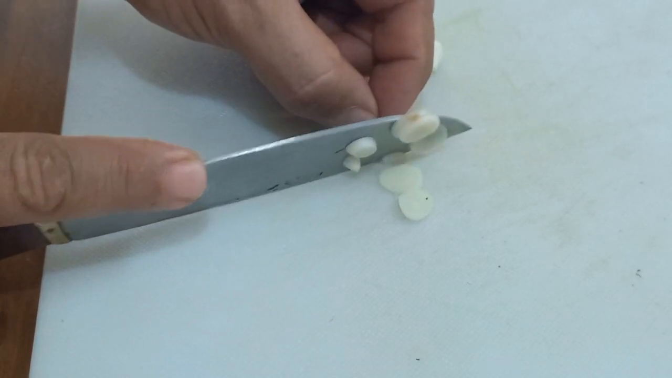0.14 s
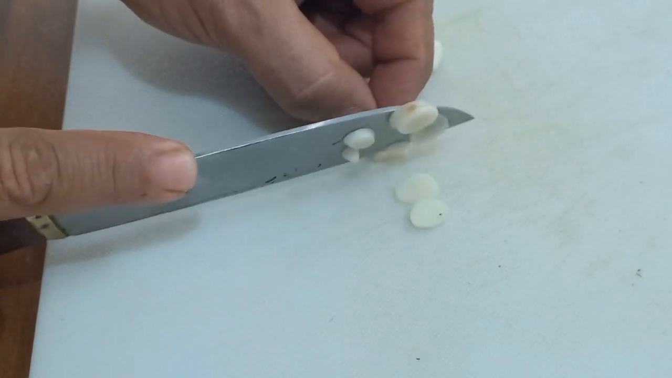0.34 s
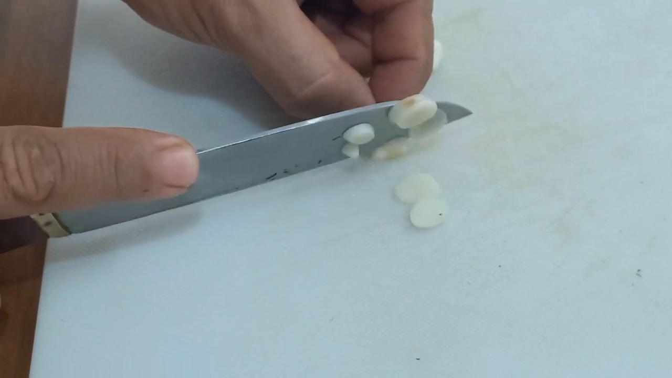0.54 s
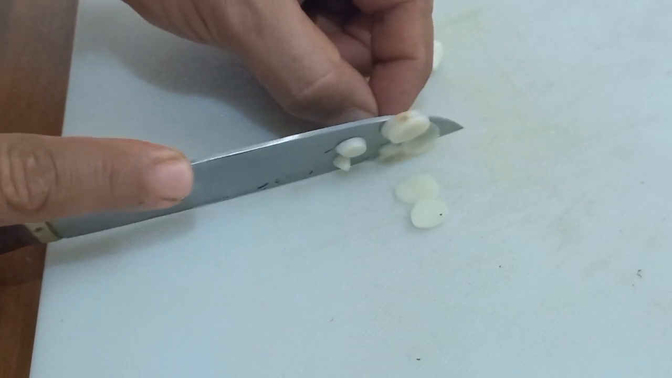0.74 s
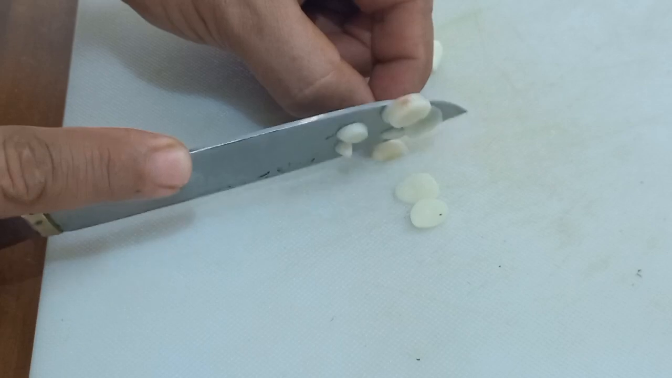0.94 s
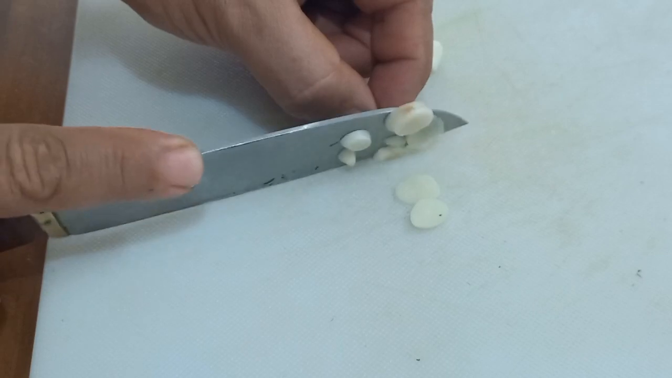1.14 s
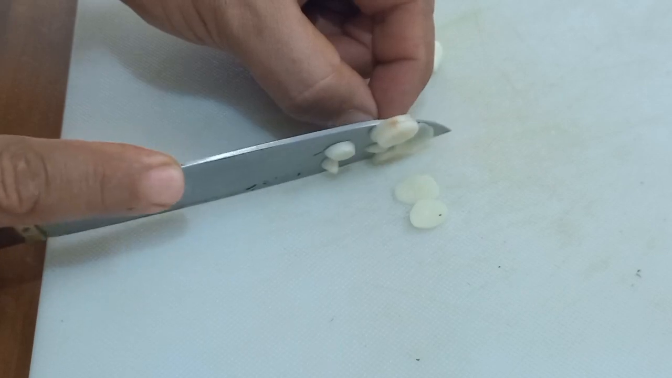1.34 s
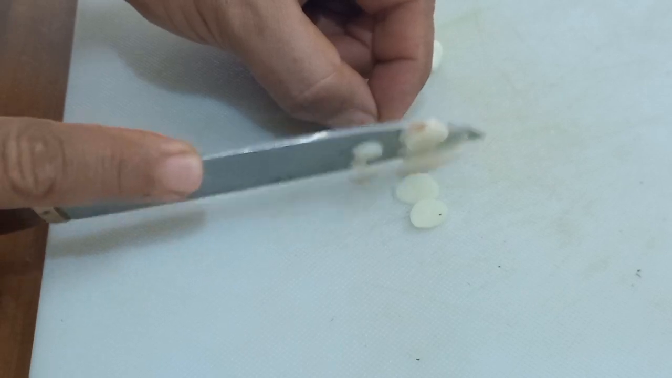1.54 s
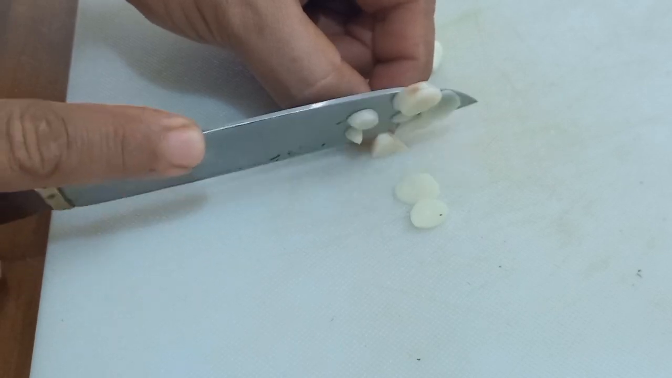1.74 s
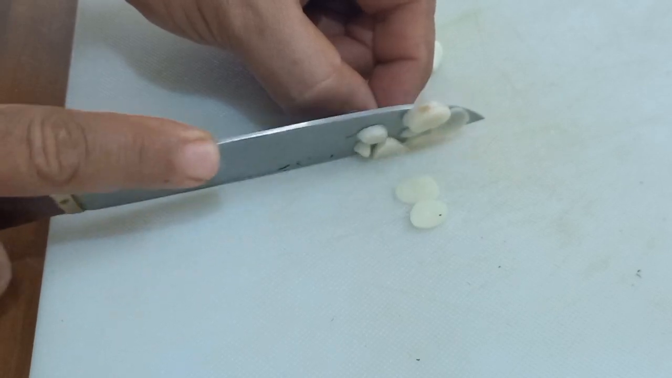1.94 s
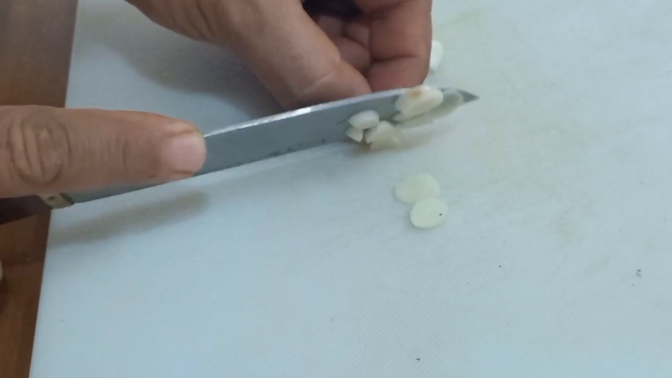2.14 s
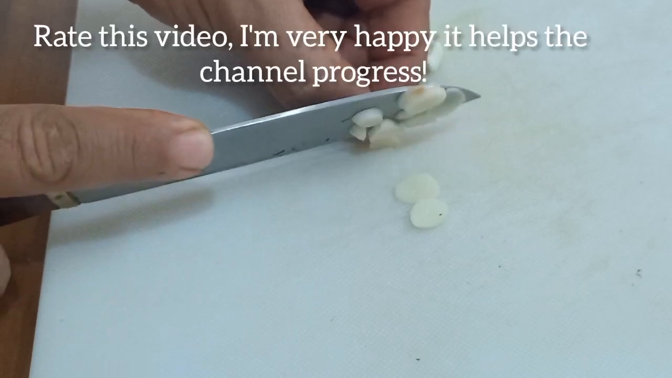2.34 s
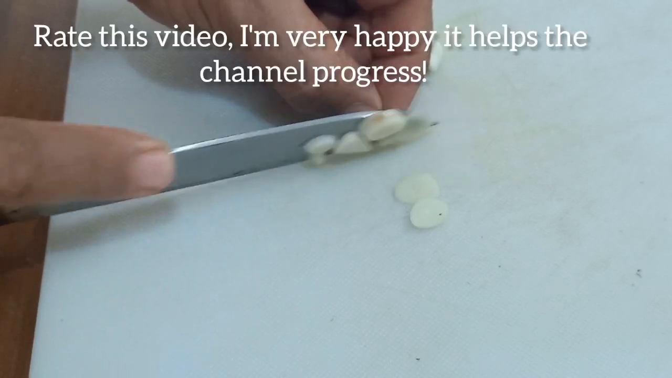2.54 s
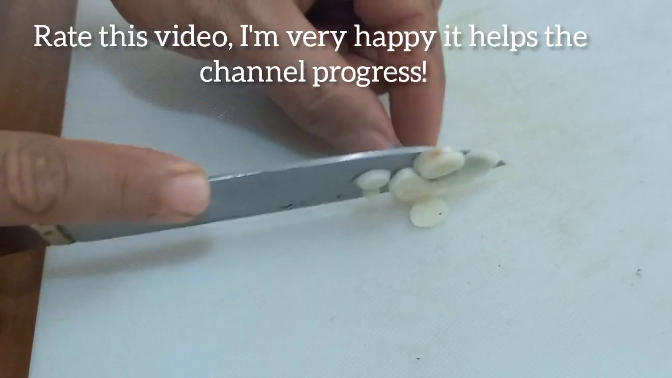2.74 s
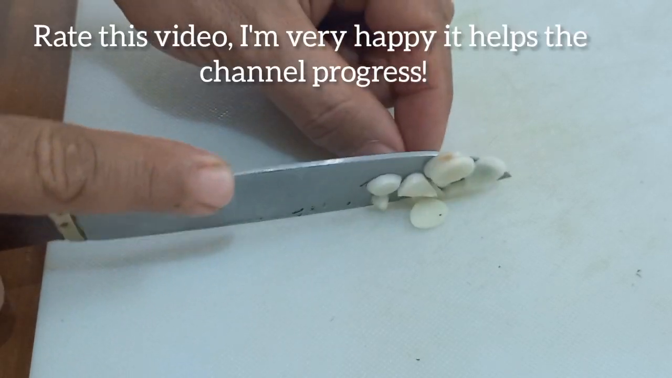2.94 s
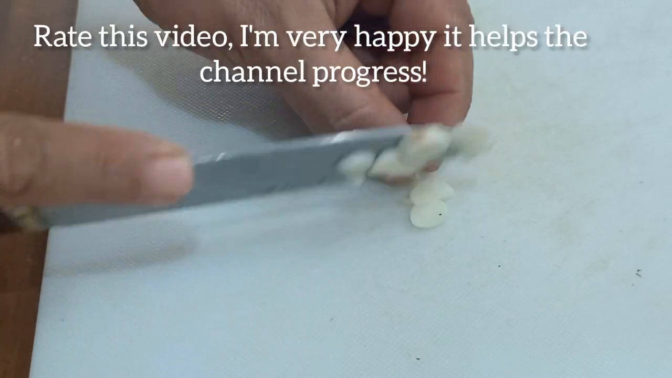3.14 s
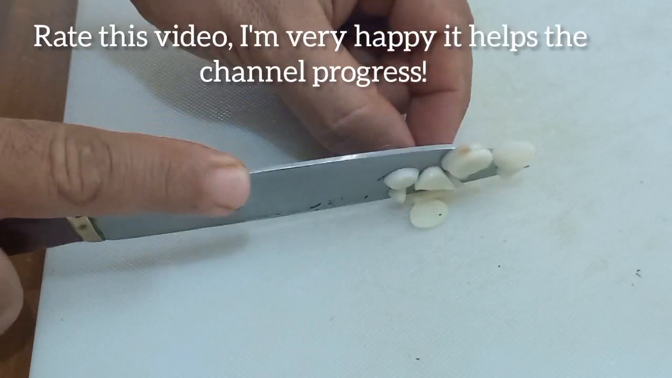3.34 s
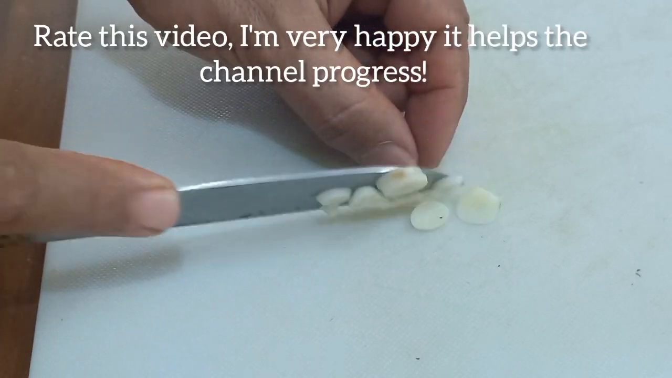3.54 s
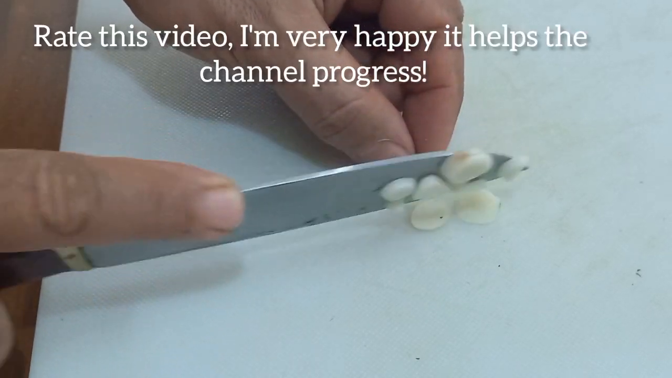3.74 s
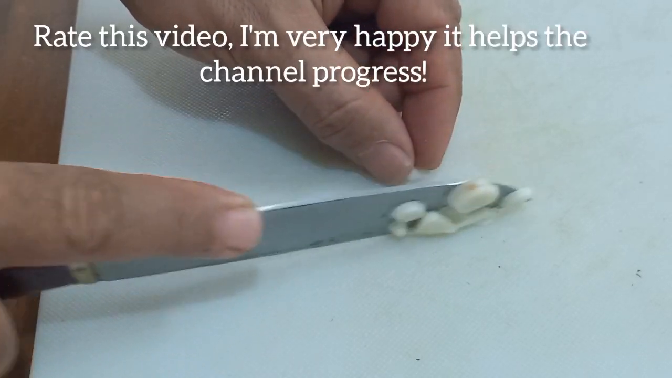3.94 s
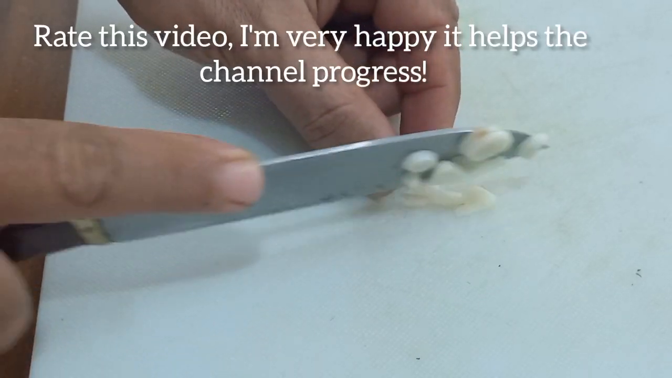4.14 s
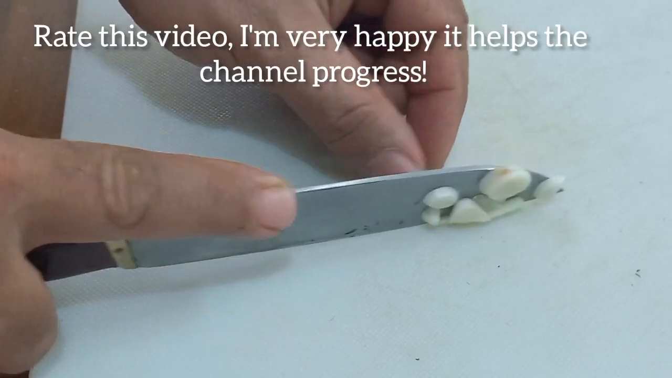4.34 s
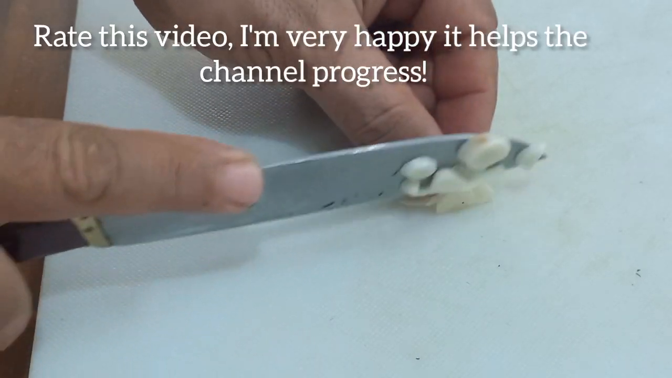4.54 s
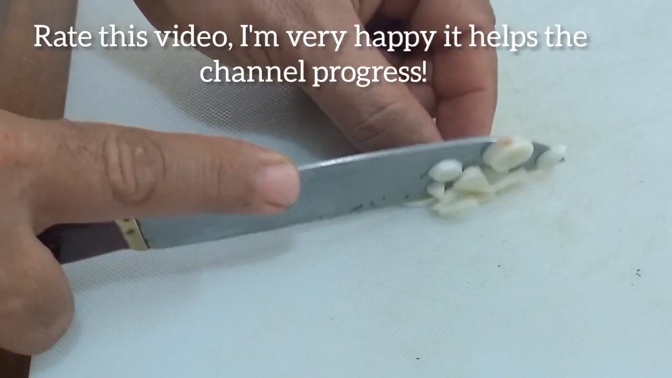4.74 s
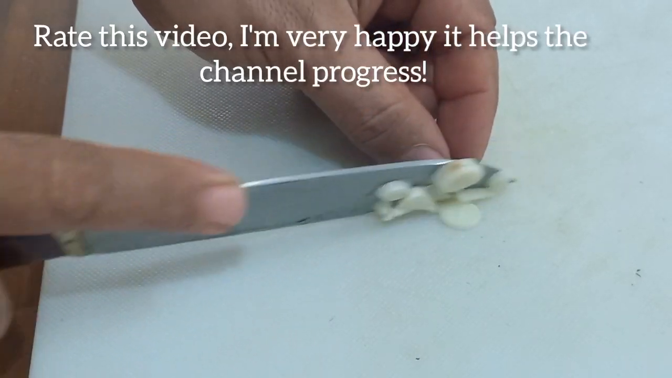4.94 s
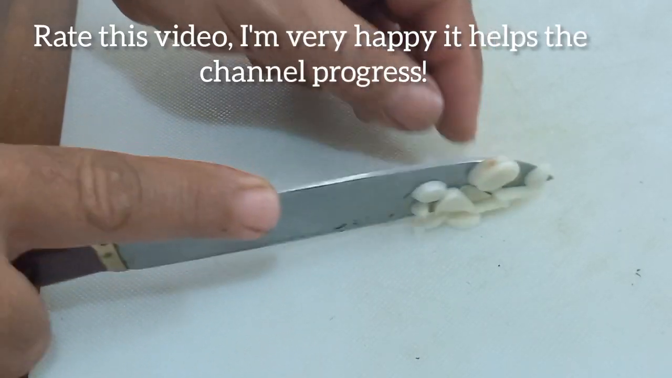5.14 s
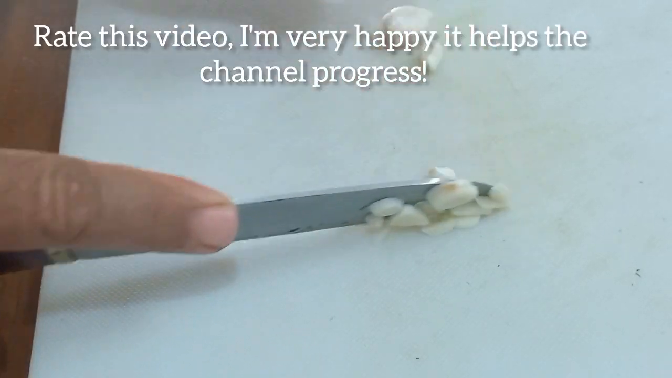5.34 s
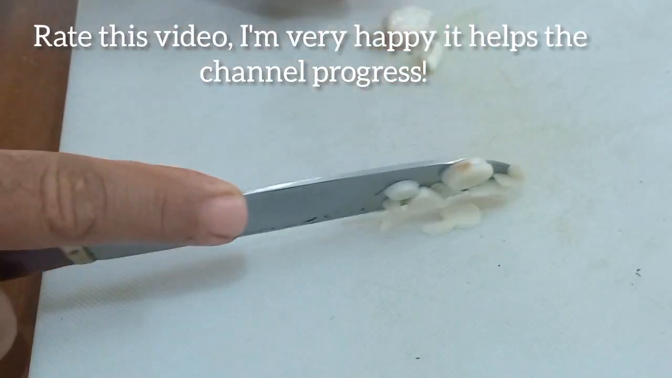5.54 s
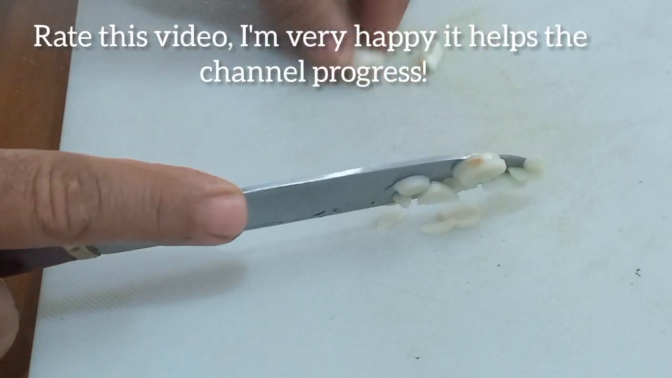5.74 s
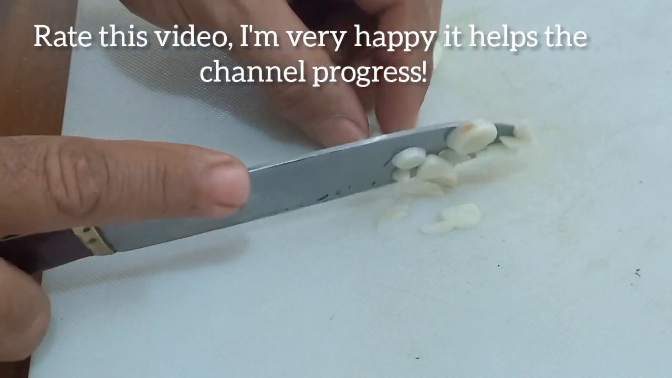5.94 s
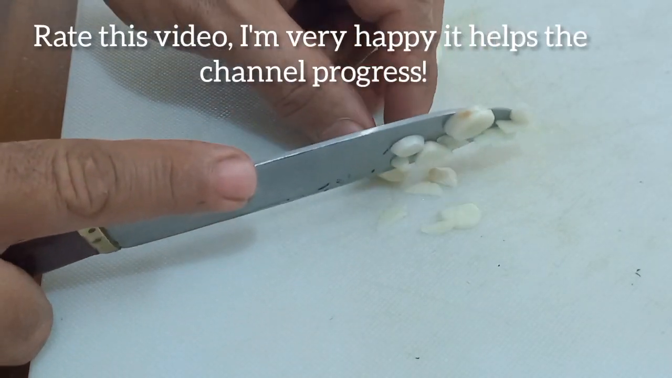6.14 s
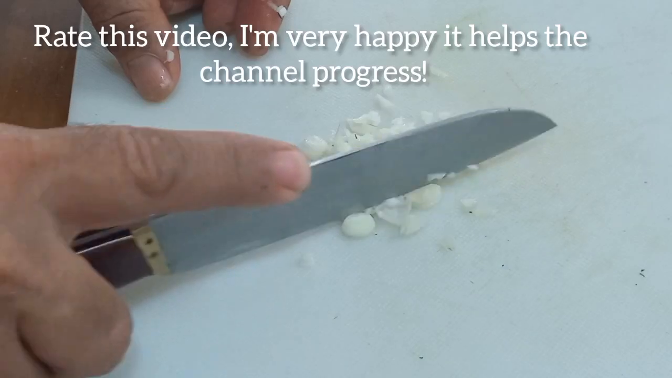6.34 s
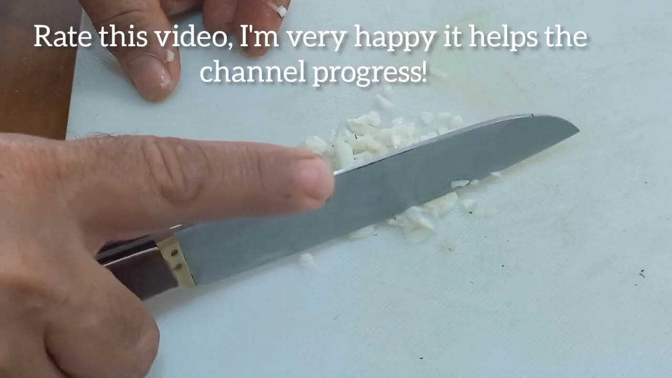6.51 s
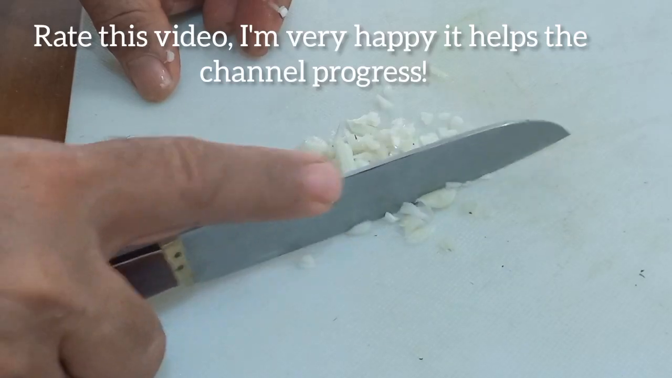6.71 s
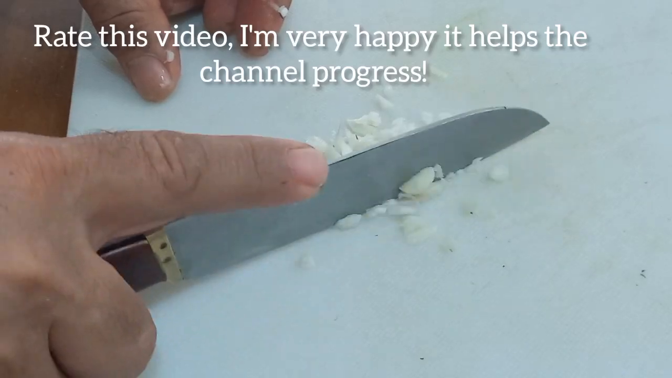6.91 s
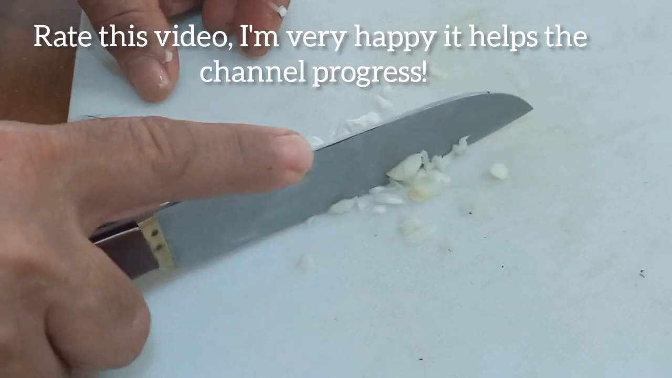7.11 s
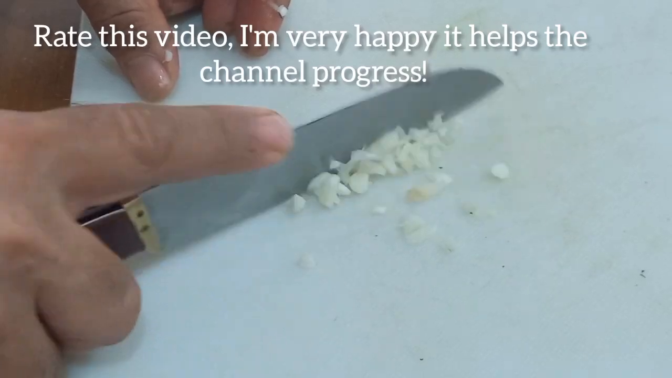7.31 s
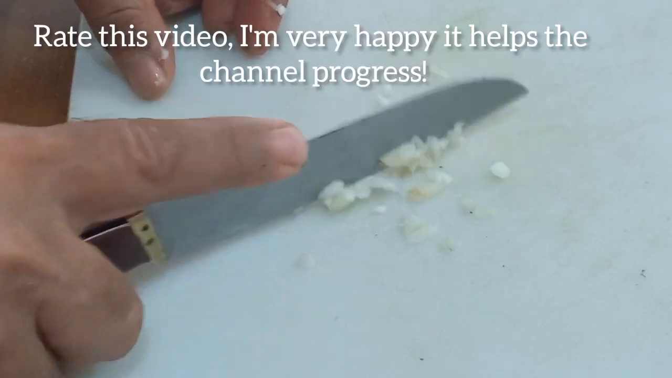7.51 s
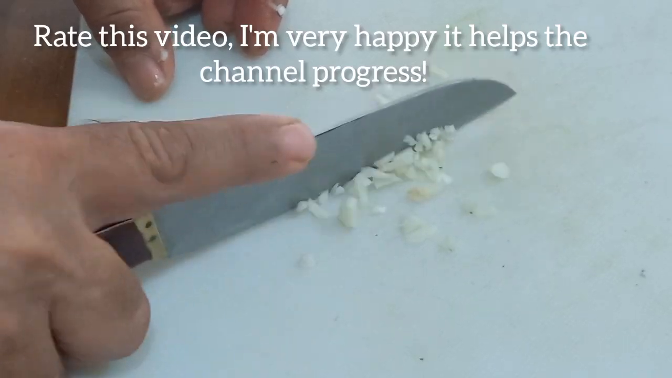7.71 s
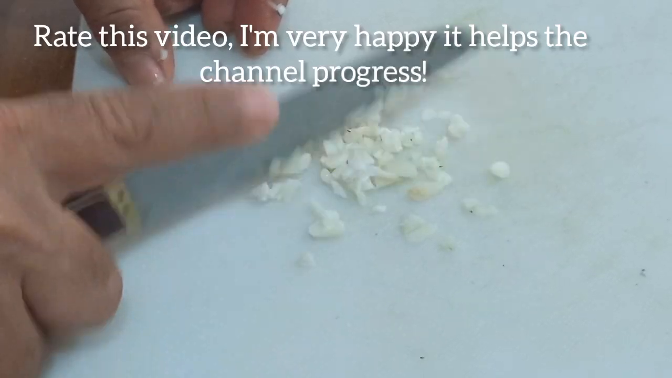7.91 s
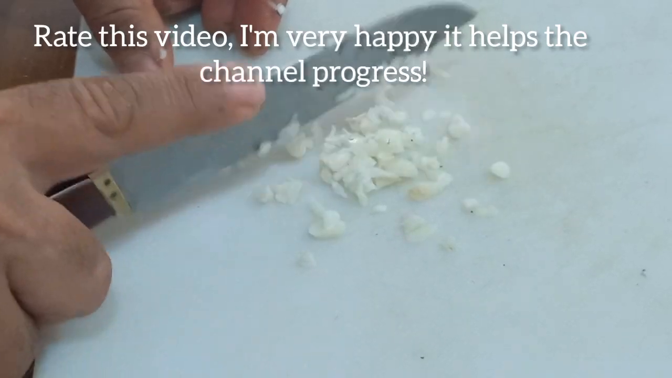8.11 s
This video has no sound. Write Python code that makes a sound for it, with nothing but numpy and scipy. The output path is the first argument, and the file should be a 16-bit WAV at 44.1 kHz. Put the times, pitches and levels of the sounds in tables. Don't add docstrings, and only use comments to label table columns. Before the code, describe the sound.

A knife slices garlic on a plastic board, close up: separate clicking, cracking knocks about half a second apart, with small snaps and sticky ticks between them. After a short gap it minces with duller, uneven chops, board bumps and a final quick clatter. Water plinks quietly to the right over faint appliance hum and hiss in a small, hard-walled kitchen.

```python
import sys
import numpy as np
from scipy import signal
from scipy.fft import rfft, irfft, next_fast_len
from scipy.io import wavfile
from scipy.ndimage import uniform_filter1d

SR = 44100
rng = np.random.default_rng(int(sys.argv[2]) if len(sys.argv) > 2 else 0)


def makeup_ratio(level_db):
    decades = np.asarray(level_db, float) / 20
    return 10 ** decades


def master_out(mix):
    frames = np.transpose(np.atleast_2d(mix))
    ceiling = np.clip(frames, -1, 1)
    pcm = np.round(ceiling * 32767).astype(np.int16)
    wavfile.write(sys.argv[1], SR, pcm)


N = 364707

# f/Hz, width/Hz, level/dB
HUM_MODES = [
    [(125.2, 18, 2), (150, 78, -9.5)],
    [(232.8, 32, -7), (251.3, 18, -10)],
]
# t/s, lower hum level/dB, upper hum level/dB
HUM_LEVELS = [(0.0, -59, -61), (0.39, -63, -67.5), (1.04, -55.5, -62), (1.7, -60, -66), (1.91, -47, -54),
              (2.14, -66, -67.5), (2.851, -53.5, -63.5), (3.129, -66, -67), (4.118, -55.5, -64),
              (4.72, -59, -59), (5.57, -60, -63), (5.94, -59.5, -60.5), (6.42, -57.5, -64), (6.77, -61, -58),
              (6.96, -65, -68), (7.62, -52.5, -62), (7.95, -57, -63.5), (8.27, -66, -65)]
# f/Hz, density/dB per Hz
AIR_SPECTRUM = [(250, -12), (676, -15.5), (959, -25.5), (1880, -18.5), (2250, -23.5), (3350, -21),
                (8450, -31.5), (15800, -22.5)]
# f/Hz, t60/s, level/dB
WALL_TAIL = [(98, 0.47, 10), (300, 0.52, 2), (830, 0.52, 1.5), (2000, 0.37, 2.5), (3320, 0.47, -1.5),
             (6000, 0.44, -2.5), (11000, 0.12, -11)]
# t/s, level/dB
ECHOES = [(.0036, -24), (.0100, -11), (.0145, -22), (.0212, -15), (.029, -21), (.033, -20), (.038, -24),
          (.042, -25), (.050, -21)]
# t/s, peak level/dB, f/Hz
DROPS = [(0.0136, -46.5, 3680), (0.156, -42, 3200), (0.2159, -50, 4050), (0.404, -41, 3320),
         (0.5186, -47, 4340), (0.9293, -44, 3300), (1.0161, -40, 3370), (1.654, -42.5, 4150),
         (2.0652, -43.5, 3900), (2.1226, -47, 4160), (2.598, -44, 3850), (2.799, -47, 4150),
         (3.1338, -48, 3440), (3.3104, -46, 3860), (3.56, -46.5, 4870), (3.691, -55, 4230),
         (4.0986, -37, 3970), (4.1894, -44.5, 4000), (4.4413, -45.5, 3420), (4.5795, -45.5, 4170),
         (4.6357, -53, 3350), (5.0654, -44, 3830), (5.323, -39.5, 3460), (5.5478, -51, 3730),
         (5.6273, -43.5, 3430), (5.7186, -42.5, 3600), (6.8157, -43.5, 4100), (7.0334, -45.5, 4500),
         (7.3404, -44.5, 3820), (7.9212, -39, 3720), (0.2808, -49, 3600), (1.7614, -44, 3510),
         (3.0769, -45.5, 2720), (3.1996, -49, 3950), (7.43, -50, 3150), (5.4964, -48.5, 1950),
         (5.845, -48, 1900), (6.28, -50, 1940), (7.33, -47, 1950)]
# t/s, peak level/dB, f/Hz
PLOPS = [(0.4663, -55, 3150), (0.6964, -40.5, 2414), (0.7943, -46, 2530), (0.8994, -45, 2930),
         (1.264, -45, 3110), (4.349, -56, 2370), (5.5273, -46.5, 3360), (5.7972, -52, 2390),
         (6.045, -46.5, 2900), (6.1918, -45.5, 3400), (6.53, -47.5, 2450), (6.8463, -41.5, 2380),
         (7.8073, -46, 3230), (8.0294, -55, 3950), (5.5912, -45.5, 2940), (0.76, -50, 3400),
         (0.6, -47, 2700), (6.49, -60, 2600)]
# t/s, level/dB, low f/Hz, high f/Hz, t60/s
SPLASHES = [
    (2.125, -58.5, 4000, 5170, 1),
    (4.636, -45, 2000, 5760, 0.48),
    (5.798, -51, 2930, 5600, 0.89),
    (6.255, -51.5, 2460, 4280, 0.27),
    (6.43, -55, 3520, 5400, 0.18),
]
# t/s, peak level/dB, f/Hz, t60/s
BUMPS = [(0.598, -38, 300, 0.061), (2.697, -48, 314, 0.42), (2.778, -40, 373, 0.21),
         (7.952, -30, 330, 0.14), (5.599, -42, 290, 0.48), (5.86, -40.5, 347, 0.28),
         (6.607, -30.5, 170, 0.091), (6.87, -21, 150, 0.035), (7.095, -29, 300, 0.21),
         (7.31, -35, 300, 0.31), (7.513, -29, 300, 0.06)]
# t/s, peak level/dB, f/Hz, left over right/dB
TICKS = [(0.0947, -50, 13900, 7.5), (0.2853, -50, 14400, 12.0), (0.602, -52, 13100, 4.5),
         (0.839, -53, 13900, 4.0), (0.8574, -52, 13500, -0.5), (1.7685, -49, 15630, 5.5),
         (1.9789, -51, 12600, 4.5), (2.0024, -45, 15400, 8), (2.0882, -56, 12900, 10.0),
         (2.6833, -50, 15000, 12.0), (3.167, -58, 13460, 9.0), (4.0028, -44, 14200, 11),
         (4.7127, -53, 14200, 13.0), (5.011, -57, 13600, 8.5), (5.4728, -56, 13400, 10.0),
         (5.9474, -57, 12400, 9.0), (7.1921, -49, 13600, 7), (7.9433, -52, 12900, 4.0),
         (8.1579, -45, 12500, 9), (8.1693, -40, 10600, 12)]
# t/s, peak level/dB, centre f/Hz
SNAPS = [(0.097, -51, 5350), (0.285, -42, 6660), (0.486, -44, 5090), (0.6012, -38, 5160),
         (0.836, -39.5, 5000), (1.6008, -54, 7390), (1.77, -42, 6040), (1.998, -43.5, 4960),
         (2.0883, -53, 5070), (2.6833, -55, 5040), (2.7666, -63, 5180), (3.1652, -54, 5100),
         (3.6544, -46, 6900), (3.7045, -40.5, 6740), (4.003, -44, 7000), (4.712, -49, 5540),
         (5.4735, -50, 6890), (5.5636, -43, 5100), (5.9017, -42.5, 5120), (5.9464, -57, 5490),
         (6.595, -50, 7050), (7.192, -37.5, 7000), (7.318, -44, 5110), (7.94, -38.5, 4930),
         (7.9703, -42, 5130)]
# thud/dB, hollow knock/dB, crack/dB
CHOPS = [(0.062, -22.5, -19, -2.5, -3.5), (1.112, -19, -17, -3.5, -9.5), (1.856, -12, -20.5, -4, -2.5),
         (2.414, -10.5, -11, -4, 0), (2.92, -17, -16.5, -3.5, -5.5), (3.401, -15.5, -24, -1.5, -2),
         (3.877, -12.5, -20, -6, 1.5), (4.267, -21, -13, -5, -3), (4.822, -13, -31, -3.5, -2),
         (5.215, -25.5, -10.5, -4.5, -2.5), (6.637, -14.5, -8.5, -2.5, 0.5), (6.885, -18, -9.5, -2, -2),
         (7.539, -17, -4.5, -2.5, -1.5), (7.732, -24.5, -10, -2, -1)]
# middle modes/dB, lingering crunch/dB, top hiss/dB, left over right/dB
SPOTS = [(0, -36, 13, 3), (0, -33, 11, 2.5), (3, -30, -2, 2), (4, -39, 5, 2), (0, -27, -8, 2),
         (0, -10, -10, 2.5), (0, -19, -4, 2.5), (0, -31, -4, 2.5), (0, -17.5, 10, 2.5), (1, -23, -7, 2.5),
         (3, -22, 7, 2), (3, -16.5, 3, 1.5), (1, -30, 4, 1.5), (3, -26, 0, 0)]
# t/s, peak level/dB,
# thud/dB, hollow knock/dB, crack/dB
TOUCHES = [(0.246, -37, -8, -3.5, -16), (0.618, -30.5, -15, 2.5, -16), (0.838, -41, -9, -36, -8),
           (1.385, -39, -2, -2.5, -10.5), (1.783, -37.5, -0.5, -4.5, 14), (1.995, -33.5, -8.5, -1, -16),
           (2.796, -56, 17.5, -8, -3), (3.404, -16.5, -27, -15, -6), (7.101, -34, -5, 2, -11),
           (7.516, -44, 2, -1, -15), (7.113, -21.5, -20, -1, -2), (7.123, -25, -9, 1, 3),
           (7.199, -61, 4, -8, -15), (7.302, -40, 8, 0.5, -15), (7.945, -38.5, -13, -15, -5),
           (7.966, -41, -1, -21, -7), (8.156, -21, -7, -10, 3), (8.162, -16, -26, -17.5, 0),
           (8.168, -13, -9, -9.5, 2.5), (8.176, -14.5, -19, -15, -6), (8.195, -25.5, -22, -4, 7),
           (2.02, -56, -3, 3, -6)]
# f/Hz, level/dB, t60/s
BOARD_MODES = [(359, 6, 0.16), (468, 3.5, 0.14), (592.4, 9, 0.058), (643, 11.5, 0.064), (764, -9.5, 0.042),
               (989, 12, 0.037), (1159, 14, 0.045), (1305, 8.5, 0.066), (1477, 7.5, 0.18),
               (1902, 11, 0.051), (2090, -3, 0.065), (2600, 4.5, 0.036), (2860, -1, 0.055),
               (3746, 10, 0.014)]
# f/Hz, level/dB, t60/s
HEEL_MODES = [(337, 13.5, 0.083), (421, 2, 0.12), (482, 8.5, 0.13), (653, 10.5, 0.16), (780, -4.5, 0.041),
              (1173, 12, 0.047), (1309, 17, 0.027), (1380, 4, 0.089), (1932, 11.5, 0.05),
              (2000, 3.5, 0.051), (2217, -7, 0.025), (2100, -6, 0.029), (2770, 2.5, 0.14),
              (4160, -2, 0.021)]
# f/Hz, level/dB, t60/s
WORKTOP_MODES = [(120.3, 2.5, 0.23), (144, -9, 0.24), (269.6, -0.5, 0.18)]
# f/Hz, density/dB per Hz
RATTLE_SPECTRUM = [(60, -35), (120, 5.5), (300, -2), (1300, -11.5), (1660, -15), (1950, -9), (3600, -25.5),
                   (9000, -42)]
# t/s after the landing, signed size
KNOCK_PATHS = [(.003, 1.2), (.0065, -0.4), (.010, 1.2), (0.016, 0.46), (0.0192, -0.81), (.029, -0.18),
               (.033, -0.27), (0.039, -0.57), (.042, .4), (.050, -0.014)]

MINCE_S = 6
KNOCK_HZ, MIDDLE_HZ = 850, 2000
SWELL_S, RING_S = 0.0034, .085


def table(rows, hz):
    f, v = np.transpose(rows)
    return np.interp(np.log(np.maximum(hz, 1)), np.log(f), v)


def unit(x):
    return x / np.sqrt(np.mean(x ** 2))


def shape(x, gain):
    n = next_fast_len(x.shape[-1])
    return irfft(rfft(x, n) * gain(np.fft.rfftfreq(n, 1 / SR)), n)[..., :x.shape[-1]]


def band(x, lo_hz, hi_hz):
    sos = signal.butter(2, [lo_hz, min(hi_hz, SR / 2.2)], "band", fs=SR, output="sos")
    return signal.sosfilt(sos, x)


def steep_band(x, lo_hz, hi_hz):
    return band(band(x, lo_hz, hi_hz), lo_hz, hi_hz)


def clock(length_s):
    return np.arange(int(length_s * SR)) / SR


def rise(t, rise_s):
    return np.minimum(t / rise_s, 1)


def fade(t, t60):
    return np.exp(-np.log(1000) * t / np.maximum(t60, .002))


def pair(length, split_hz):
    mid, side = rng.standard_normal((2, length))
    side = shape(side, lambda f: 1 / np.sqrt(1 + (split_hz / (f + 1)) ** 3))
    ports = np.array([mid + side, mid - side])
    return shape(ports, lambda f: 1 / np.sqrt(1 + 1 / (1 + (split_hz / (f + 1)) ** 3)))


def add(out, s, sound, db, pan_db):
    i = int(s * SR)
    n = min(sound.shape[-1], N - i)
    out[:, i:i + n] += sound[..., :n] * makeup_ratio(db + np.array([[pan_db], [-pan_db]]) / 2)


def walk(rate):
    k = int(SR / rate)
    held = np.repeat(rng.standard_normal(N // k + 1), k)
    return 1.5 * uniform_filter1d(held, k)[:N]


def room_modes(group):
    def gain(f):
        return np.sqrt(sum(makeup_ratio(2 * db) / (1 + (2 * (f - hz) / width) ** 2) ** 2 for hz, width, db in group))
    return gain


def kitchen():
    s, lower_db, upper_db = np.transpose(HUM_LEVELS)
    t = np.arange(N) / SR
    lower_db = np.interp(t, s, lower_db)
    upper_db = np.interp(t, s, upper_db + 61.5)
    hum = 0
    for group, db in zip(HUM_MODES, (lower_db, -61.5 + upper_db)):
        hum = hum + unit(shape(pair(N, 460), room_modes(group))) * makeup_ratio(db + 5.0 + 1.0 * walk(6.0))

    air = shape(pair(N, 1130), lambda f: makeup_ratio(table(AIR_SPECTRUM, f)))

    def part(lo, hi):
        return shape(air, lambda f: (f >= lo) * (f < hi))

    house = unit(part(280, 1700)) * makeup_ratio(-65 + 0.18 * upper_db + 6.5 + 2.2 * walk(14.0))
    whine = unit(band(air, 1860, 2020)) * makeup_ratio(-70.5 + 2 * walk(14))
    patter = 0
    for lo, hi in [(1700, 2800), (2800, 3900), (3900, 5400), (5400, 7900)]:
        patter = patter + part(lo, hi) * makeup_ratio(1.9 * walk(28))
    patter_db = -64.5 + 0.12 * upper_db + 6.5
    patter = unit(patter) * makeup_ratio(patter_db + np.array([[-.8], [.8]]))
    hiss = unit(part(7900, SR)) * makeup_ratio(-67 + 4 + .6 * walk(16) + np.array([[2], [-2]]))
    rumble = unit(band(air, 45, 95)) * makeup_ratio(-76 + 2.5 * walk(3))
    return hum + house + whine + patter + hiss + rumble


def diffuse_tail(t):
    corner, t60, db = np.transpose(WALL_TAIL)
    noise, tail = pair(len(t), 1250), 0
    for hz in 70 * 2. ** np.arange(0, 8, .5):
        band_t60, band_db = (np.interp(np.log(hz), np.log(corner), v) for v in (t60, db))
        gap_s = 0.0062 * min(hz / 4000, 1)
        opening = np.clip((t - gap_s) / .002, 0, 1)
        tail = tail + band(noise, hz / 2 ** .25, hz * 2 ** .25) * fade(t, band_t60) * makeup_ratio(band_db) * opening
    cupboard = band(noise, 790 / 1.05, 790 * 1.05) * fade(t, 0.45) * makeup_ratio(-4)
    tail = tail + cupboard * rise(t, 0.16)
    lines = rfft(tail)
    size = np.abs(lines)
    return irfft(lines * np.sqrt(uniform_filter1d(size, size=24) / size), len(t))


def walls(x, wet_db, count=2):
    t, out = clock(.37), 0
    place = (np.arange(N) / SR > MINCE_S) % count
    for k in range(count):
        answer = diffuse_tail(t) * rise(t, 0.0015) * fade(t, 0.95) * makeup_ratio(wet_db)
        for j, (s, echo_db) in enumerate(ECHOES):
            blur = np.hanning(3 + int(s * SR / 120))
            left = int(s * SR)
            right = left + 9 * (-1) ** j
            for port, i in enumerate([left, right]):
                answer[port, i:i + len(blur)] += makeup_ratio(echo_db) * blur / blur.sum()
        out = out + signal.oaconvolve(x * (place == k), answer, axes=1)[:, :N]
    return out


def drops():
    out, t = np.zeros((2, N)), clock(.15)
    for rows, (spray_db, t60, octaves) in [(DROPS, (-11, 0.29, 0.53)), (PLOPS, (-7.5, 0.27, 0.92))]:
        for s, db, hz in rows:
            tone = np.sin(2 * np.pi * hz * t + np.array([[0], [.8]])) * fade(t, .035 * (3400 / hz) ** 2)
            noise = pair(len(t), 900)
            blurred = unit(band(noise[:, ::-1], 0.95 * hz, 1.16 * hz)) * fade(t, .07)
            plink = 0.78 * tone + 0.32 * blurred
            lo, hi = hz * 2 ** (-.35 * octaves - .05), hz * 2 ** (octaves + 0.055)
            spray = unit(band(band(noise, lo, hi), 0.49 * lo, 0.78 * hi)) * fade(t, t60)
            drop = plink + makeup_ratio(spray_db) * spray * rise(t, 0.0012)
            add(out, s, drop * rise(t, 0.00065), db + 0.44, -2.5)
    for s, db, lo_hz, hi_hz, t60 in SPLASHES:
        splash = unit(steep_band(pair(len(t), 900), lo_hz, hi_hz)) * fade(t, t60)
        add(out, s, splash * np.cos(np.pi * t / .3), db, -2.5)
    return out


def bumps():
    out, t = np.zeros((2, N)), clock(.2)
    for s, db, hz, t60 in BUMPS:
        dull = unit(band(pair(len(t), 950), 0.03 * hz, 1.25 * hz))
        swing = np.sin(2 * np.pi * hz * t) * fade(t, 0.024)
        add(out, s, (swing + .5 * dull * fade(t, t60)) * rise(t, 0.0031), db, 2.5)
    return out


def ticks():
    out, t = np.zeros((2, N)), clock(.05)
    for s, db, hz, pan_db in TICKS:
        grains = pair(len(t), 900) * makeup_ratio(2.8 * rng.standard_normal(len(t)))
        grit = unit(band(grains, 0.88 * hz, 1.15 * hz))
        add(out, s, grit * rise(t, 0.001) * (fade(t, 0.023) + 0.2 * fade(t, 0.17)), db - 2.5, pan_db)
    return out


def garlic():
    out, t = np.zeros((2, N)), clock(.08)
    for s, db, hz in SNAPS:
        noise = pair(len(t), 900)
        snap = unit(0.95 * band(noise, 3000, 7200) + 1.6 * band(noise, 0.67 * hz, 1.05 * hz))
        add(out, s, snap * fade(t, 0.079) * rise(t, 0.0028), db - 7.5, 5.5)
    return out


def ring(modes, t, skew, scatter_db, lift_db):
    hz, db, t60 = np.transpose(modes)[:, :, None]
    chance = rng.standard_normal((2, len(modes), 1))
    turn = 2 * np.pi * hz * (1 + 0.003 * chance[0]) * t
    swell = np.minimum(t / SWELL_S * (1 + (hz / KNOCK_HZ) ** 4), 1)
    sign = (-1) ** np.arange(1, len(modes) + 1)[:, None]
    size = makeup_ratio(db + lift_db + scatter_db * chance[1]) * fade(t, np.minimum(t60, RING_S)) * swell * sign
    return np.array([np.sum(size * np.sin(turn), axis=0), np.sum(size * np.sin(turn - skew), axis=0)])


def edge_click(t):
    touch = np.zeros((2, len(t)))
    for lag_s, left, right in [(.0002, 0.51, 0.16), (.0007, 0.54, 1), (.0017, 0.26, 0.56)]:
        touch[:, int(lag_s * SR)] = left, right
    click = band(touch, 2560, 3780)
    return click / np.max(np.abs(click))


def hollow_slap(t):
    paths = np.zeros(len(t))
    for lag_s, size in KNOCK_PATHS:
        paths[int(lag_s * SR)] = size
    knock = np.sin(2 * np.pi * 590 * t) * fade(t, 0.0064)
    return signal.fftconvolve(paths, knock)[:len(t)]


def board_body(t, modes, habit, knock_db, middle_db, ring_db, rattle_db):
    hz = np.array(modes)[:, :1]
    skew = 2 * np.pi * hz * 0.00028 + 1.92 * np.sin(hz / 170) * np.minimum(hz / 1400, 1)

    def tilt(f):
        hollow = (knock_db + 3.0) / (1 + (f / KNOCK_HZ) ** 6)
        bass_cut = 14 / (1 + (f / 260) ** 6)
        return hollow - bass_cut + middle_db / (1 + ((f - MIDDLE_HZ) / 500) ** 4)

    noise = .5 * habit + 1.263 * pair(len(t), 1060)
    rattle = shape(noise, lambda f: makeup_ratio(table(RATTLE_SPECTRUM, f) + tilt(f) + 25.5))
    rattle = rattle * rise(t, SWELL_S) * (fade(t, 0.054) + 0.38 * fade(t, 0.26))
    return makeup_ratio(ring_db) * ring(modes, t, skew, 1.6, tilt(hz)) + makeup_ratio(rattle_db) * rattle


def crunch(t, grit):
    grains = np.repeat(rng.standard_normal(len(t) // 60), 60)
    return unit(steep_band(grit * makeup_ratio(2.1 * grains), 1800, 4400)) * fade(t, 0.28)


def blade(rows, spots, rise_s, ring_db, rattle_db, click_db, top_db, slap_db):
    out, t = np.zeros((2, N)), clock(.2)
    click, slap = edge_click(t), hollow_slap(t)
    habit = pair(len(t), 1500)
    lead = clock(.014)
    for (s, db, thud_db, knock_db, crack_db), (middle_db, crunch_db, hiss_db, pan_db) in zip(rows, spots):
        modes = BOARD_MODES if s < MINCE_S else HEEL_MODES
        body = board_body(t, modes, habit, knock_db, middle_db, ring_db, rattle_db)
        thud = ring(WORKTOP_MODES, t, 0.57, 1, thud_db)
        grit = pair(len(t), 1200)
        crack = unit(band(grit[:, ::-1], 2670, 5380)) * (fade(t, 0.024) + 0.027 * fade(t, 0.05))
        top = unit(band(grit, 9300, 18300)) * (np.exp(-(t / 0.002) ** 2) + 0.01 * fade(t, .06))
        top = top * rise(t, 0.0021) * np.array([[1.3], [.75]])
        edge = makeup_ratio(crack_db + click_db - 4.9 * (s > MINCE_S)) * click
        edge = edge + makeup_ratio(crack_db - 5) * crack
        edge = edge + makeup_ratio(top_db + hiss_db + .35 * crack_db) * top
        body = band(body * makeup_ratio(-3.0) + makeup_ratio(knock_db + slap_db) * slap, 41, 6000)
        body = body + makeup_ratio(crunch_db) * crunch(t, grit)
        crush = unit(band(grit[:, -len(lead):], 1200, 18100)) * lead / .014
        add(out, s - .014, crush, db - 44, 3.0)
        onset = rise(t, rise_s if db > -33 else .014)
        add(out, s, onset * (body + thud + edge), db - 0.93, pan_db)
    return out


def scene():
    chops = blade(CHOPS, SPOTS, 0.00046, ring_db=-10.0, rattle_db=-7.0,
                  click_db=7.5, top_db=-23.0, slap_db=5.0)
    usual_spot = (0.5, -21, 2, 1.5)
    touches = blade(TOUCHES, [usual_spot] * len(TOUCHES), 0.004, ring_db=-10.0, rattle_db=-6.5,
                    click_db=0, top_db=-28.0, slap_db=-6.5)
    near = chops + touches + garlic() + ticks() + bumps()
    far = drops()
    heard = near + walls(near, wet_db=-27.0) + far + walls(far, wet_db=-27.0, count=1)
    bass_cut = signal.butter(4, 88, "high", fs=SR, output="sos")
    return signal.sosfilt(bass_cut, heard) + kitchen()


def band_limit(x):
    return signal.sosfilt(signal.butter(12, 16800, fs=SR, output="sos"), x)


def record(dry):
    rounded = 1.1 * np.tanh(dry / 1.3)
    top_cut = signal.ellip(8, .2, 40, 15900, fs=SR, output="sos")
    mix = signal.sosfilt(top_cut, rounded)
    return band_limit(mix)


dry = scene()
out = record(dry)
master_out(out)
```